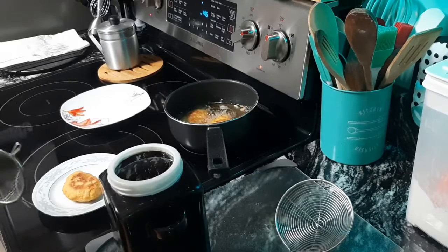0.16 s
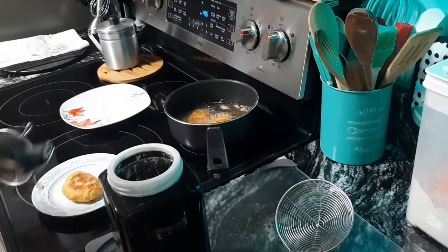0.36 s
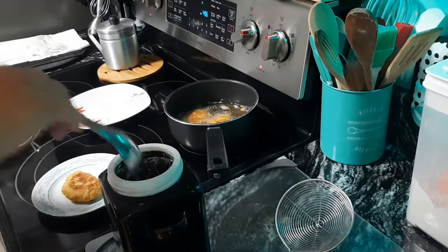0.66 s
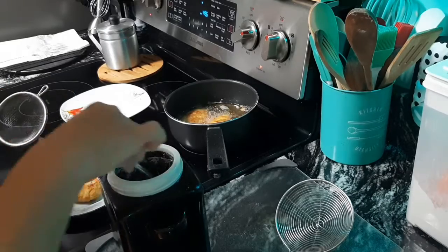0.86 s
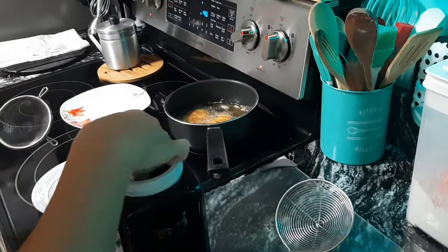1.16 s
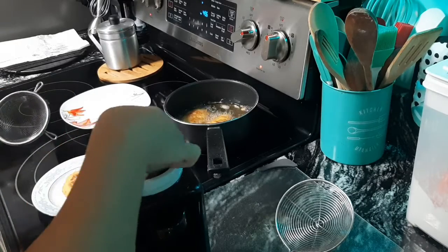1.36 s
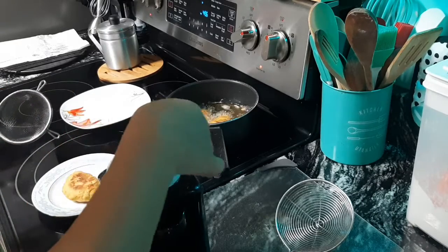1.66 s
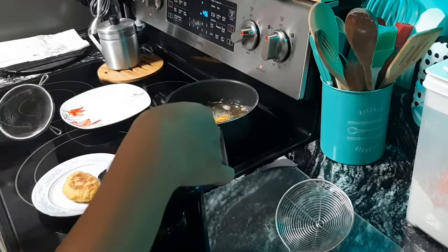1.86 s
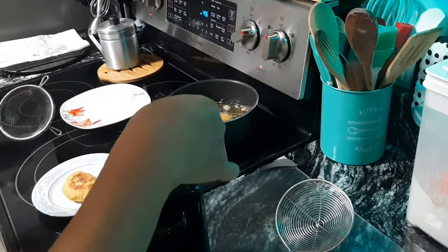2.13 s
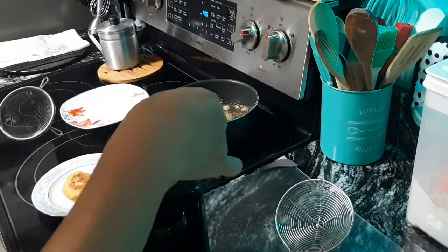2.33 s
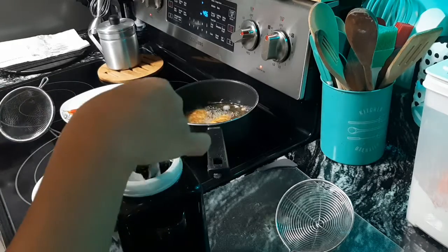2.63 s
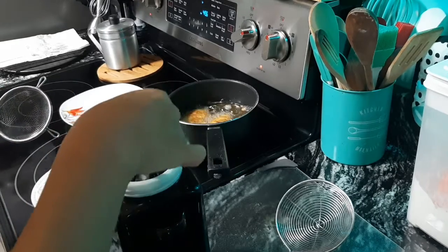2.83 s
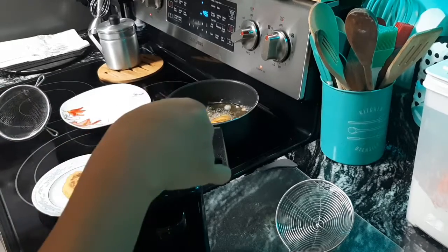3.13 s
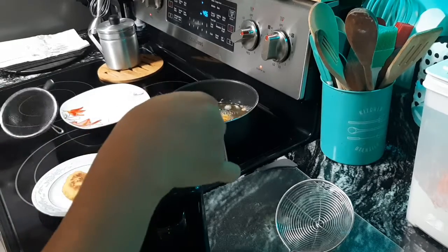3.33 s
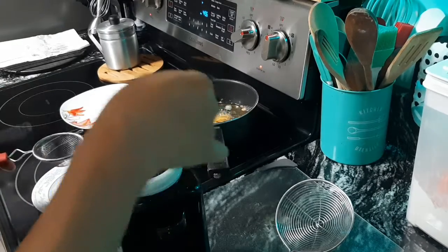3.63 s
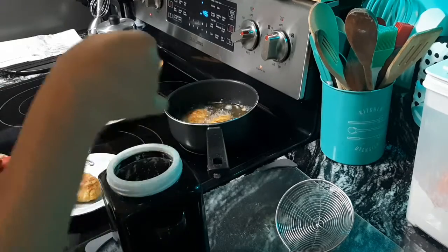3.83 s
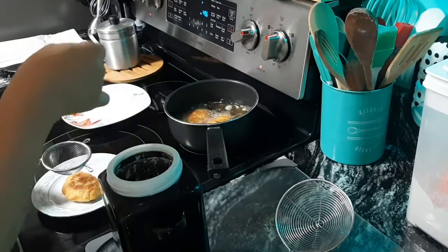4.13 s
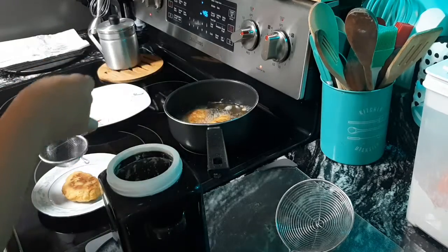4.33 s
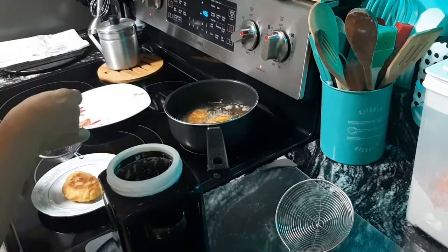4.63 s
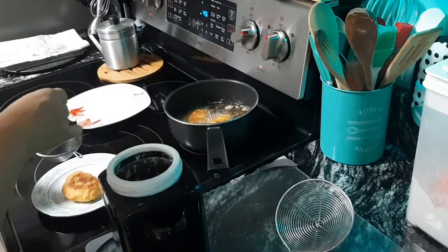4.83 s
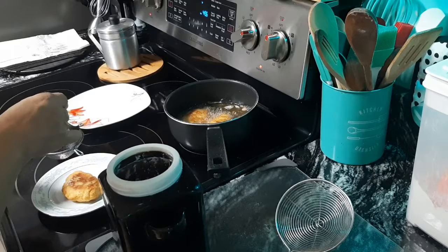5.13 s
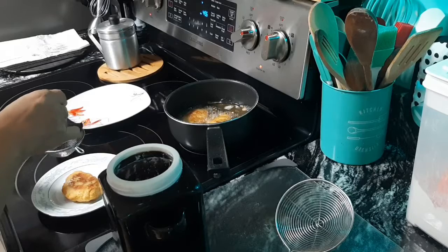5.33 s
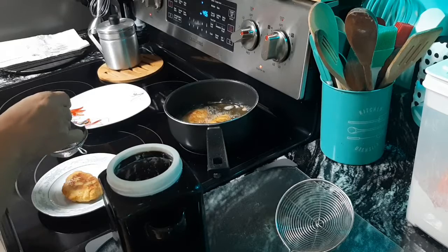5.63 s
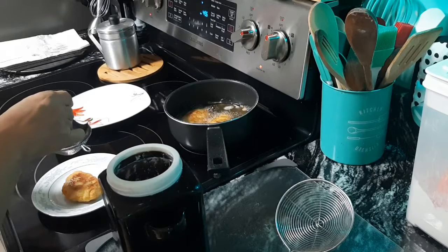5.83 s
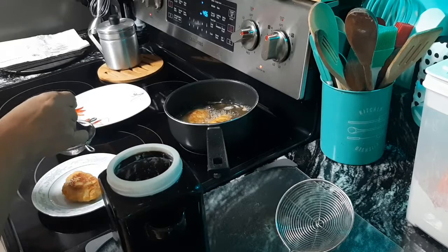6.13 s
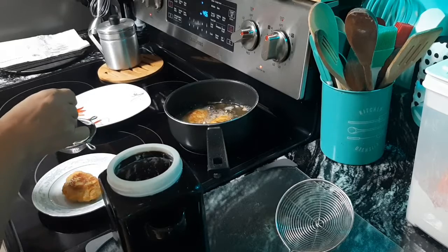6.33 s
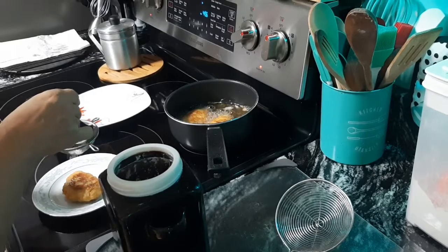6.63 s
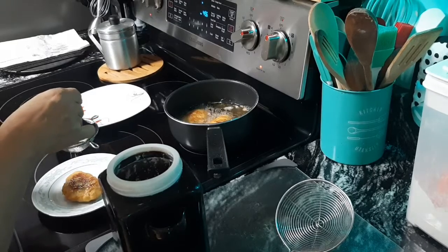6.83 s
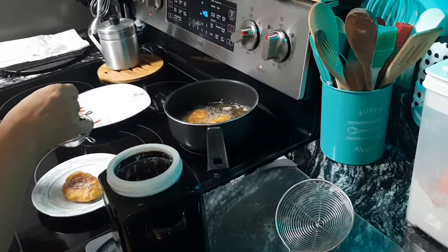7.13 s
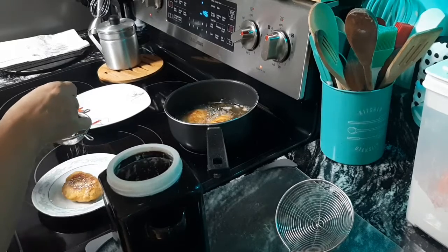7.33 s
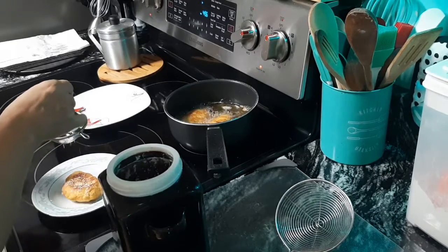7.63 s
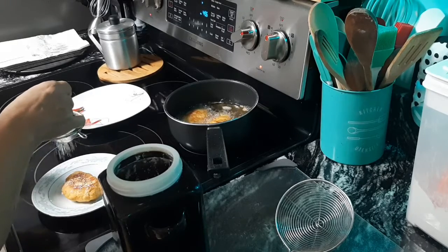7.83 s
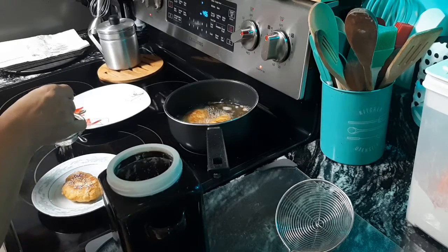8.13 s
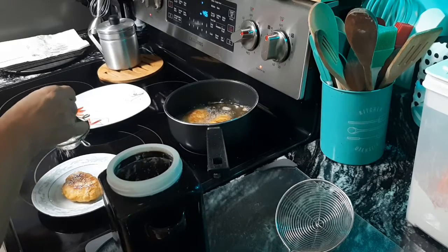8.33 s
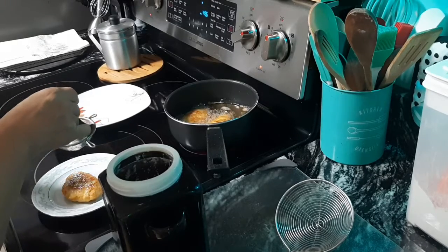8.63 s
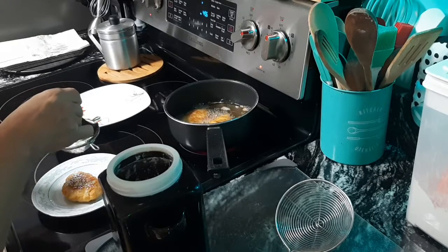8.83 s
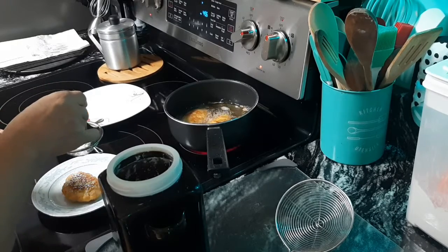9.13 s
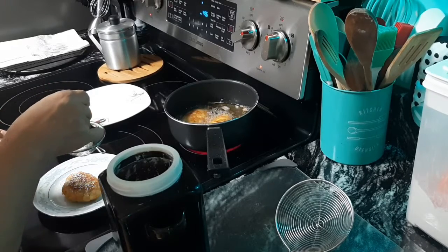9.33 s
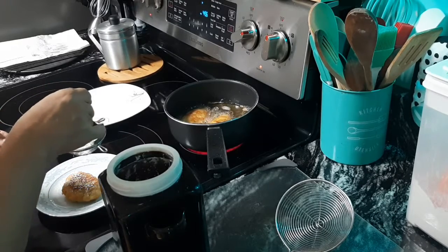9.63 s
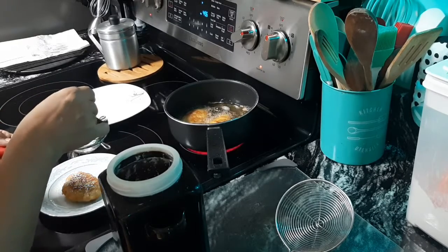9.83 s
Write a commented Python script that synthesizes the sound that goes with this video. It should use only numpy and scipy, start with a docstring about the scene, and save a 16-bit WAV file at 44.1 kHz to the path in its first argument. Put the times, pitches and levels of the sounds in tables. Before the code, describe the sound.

Close stereo pickup of a stovetop: steady, quiet fizzing oil with occasional pops, over two low machine hums that beat together. First a spoon strikes and digs in a jar, with a duller rocking knock and a sharp final clack. Powdered sugar slides softly into a sieve, which is then tapped in crisp, rattly strokes of varying strength. A faint heating hum joins late, and a little more sugar hisses at the close.

```python
"""Two kitchen motors hum and beat while dough fries gently in a small pan of oil: sines, damped-sine bubbles.
A steel spoon clinks into a jar, digs out powdered sugar (modes and coloured force, gritty strokes)
and tips it into a little sieve (hissing noise), which is tapped again and again over a plate
(resonant noise bursts). A heating ring hums late on. A small, hard kitchen adds decaying-noise tails."""
import sys
import numpy as np
from scipy import signal
from scipy.fft import rfft, irfft, next_fast_len
from scipy.io import wavfile
from scipy.ndimage import uniform_filter1d, map_coordinates

SR = 44100
rng = np.random.default_rng(int(sys.argv[2]) if len(sys.argv) > 2 else 0)


def master(y):
    """Save y as 16-bit WAV."""
    cut = np.clip(np.atleast_2d(y).T, -1, 1)
    pcm = np.round(cut * 32767)  # scale
    wavfile.write(sys.argv[1], SR, pcm.astype(np.int16))


N = 440559
T = np.arange(SR // 2) / SR  # time axis of one event, s
TOP_HZ = 15700


def amp(db):
    """Decibels to gain."""
    return 10 ** (np.asarray(db) / 20)


def unit(x):
    """Scale to rms 1."""
    return x / np.sqrt(np.mean(x ** 2) + 1e-20)


def along(points, hz):
    """Interpolate (f/Hz, value) points on a log frequency axis."""
    f, v = np.transpose(points)
    return np.interp(np.log(hz + 1), np.log(f + 1), v)


def colour(points):
    """Zero-phase response of a (f/Hz, level/dB) spectrum."""
    return lambda hz: amp(along(points, hz))


def body(peaks):
    """Causal response of (f/Hz, width/Hz, level/dB) resonances, alternating in sign."""
    def response(f):
        total = 0
        for k, (centre_hz, width_hz, db) in enumerate(peaks):
            damping = 1j * f * width_hz
            total = total + (-1) ** k * amp(db) * damping / (centre_hz ** 2 - f * f + damping)
        return total
    return response


def causal(spectrum):
    """Minimum-phase response of a (f/Hz, level/dB) spectrum, by folding its cepstrum."""
    cepstrum = irfft(np.log(colour(spectrum)(np.fft.rfftfreq(len(T), 1 / SR))))
    return np.exp(rfft(cepstrum * 2 * (T < T[-1] / 2)) - cepstrum[0])


def filtered(x, response):
    """Apply a frequency response to x."""
    n = x.shape[-1]
    m = next_fast_len(n + SR // 8)
    return irfft(rfft(x, m) * response(np.fft.rfftfreq(m, 1 / SR)), m)[..., :n]


def wobble(knots_per_s):
    """Smooth random curve through normal knots."""
    knots = rng.standard_normal(int(N * knots_per_s / SR) + 4)
    return map_coordinates(knots, [np.arange(N) * knots_per_s / SR])


def fade(t60_s):
    """Exponential decay over one event."""
    return np.exp(-np.log(1000) * T / max(t60_s, 1e-4))


def add(track, start_s, sound):
    """Mix a sound into a track."""
    part = track[:, max(round(start_s * SR), 0):][:, :sound.shape[-1]]
    part += sound[..., :part.shape[1]]


# Left-right correlation: f/Hz, correlation
STEREO_LIKENESS = [(60, 1), (130, 0.62), (300, 0.51), (650, 0.35), (1400, 0), (15000, 0.036)]


def noise(response, size):
    """Coloured stereo noise of rms 1: mid and side weights set the channel correlation."""
    def mid_side(hz):
        angle = np.arccos(np.clip(along(STEREO_LIKENESS, hz), -1, 1)) / 2
        return response(hz) * np.array([np.cos(angle), np.sin(angle)])
    mid, side = filtered(rng.standard_normal((2, size)), mid_side)
    return unit(np.array([mid + side, mid - side]))


def stroke(response, length_s, grit_db=0.5):
    """One gritty rub that swells to its peak at length_s / 3, then fades."""
    u = T / (length_s / 3)
    roughness = unit(uniform_filter1d(rng.standard_normal(len(T)), size=90))
    grit = unit(amp(grit_db * roughness))
    return u * np.exp(1 - u) * grit * noise(response, len(T))


def rub(hz, length_s):
    """Dull stroke around one broad pitch."""
    return stroke(lambda f: body([(hz, hz * 1.6, 0)])(f) ** 2, length_s)


# Kitchen decay: f/Hz, t60/s
KITCHEN_T60 = [(150, 0.92), (1500, 0.55), (3000, 0.403), (7000, 0.3), (14000, 0.259)]


def in_room(x, wet_db):
    """Add a fresh diffuse tail of decaying noise whose treble dies first."""
    hz, t, z = signal.stft(rng.standard_normal((2, len(T))), SR, nperseg=256)
    decay = np.exp(-np.log(1000) * t / along(KITCHEN_T60, hz)[:, None])
    tail = signal.istft(z * decay, SR, nperseg=256)[1]
    tail = tail / np.linalg.norm(tail[0])
    return x + amp(wet_db) * signal.fftconvolve(x, tail, axes=1)[:, :x.shape[1]]


# Sieve taps: t/s, level/dB
SIEVE_TAPS = [(5.6275, -34.5), (5.798, -32), (6.3005, -30.5), (6.4594, -28.5), (6.6167, -40.5),
              (6.792, -26.5), (7.154, -35.5), (7.3374, -38.5), (7.527, -32), (7.7238, -25), (7.9022, -31),
              (8.055, -27.5), (8.2299, -38.5), (8.4235, -34), (8.5937, -36.5), (8.774, -39),
              (8.9453, -30.5), (9.1068, -34.5), (9.3026, -31.5), (9.5198, -30.5), (9.7291, -26.5)]
# Wire-frame resonances: f/Hz, width/Hz, level/dB
SIEVE_FRAME = [(2316, 386, -10.5), (4280, 700, 0), (5125, 393, 0.5), (6000, 460, 2), (6390, 434, 0),
               (7955, 200, 2.5), (9040, 400, -11), (10402, 212, -2), (12086, 460, -1), (12607, 320, 0.5),
               (14400, 270, -9.5)]
# Sugar and mesh hiss, also used by sugar(): f/Hz, level/dB
SUGAR_HISS = [(400, -25), (650, -3), (900, -6), (1260, -8.5), (1520, -5.5), (1800, -4.5), (2660, -2.5),
              (7320, 1), (8860, -5.5), (12100, -5.5), (15500, -8)]
ORDINARY_TAP_DB, CHATTER_S = -31, 0.014
BRIGHTEN_DB_PER_OCT_PER_DB, MAX_BRIGHTEN_DB_PER_OCT = 0.67, 1.92  # harder taps are brighter
THUD_GROWTH_DB_PER_DB = 0.4  # thud grows less than chatter


def sieve(snap_db=-5, thud_db=-14, mesh_db=-9):
    """Each tap: a sharp snap, then brief chatter of the mesh in its resonant wire frame."""
    out = np.zeros((2, N))
    for s, db in SIEVE_TAPS:
        harder_db = db - ORDINARY_TAP_DB
        tilt_db = min(BRIGHTEN_DB_PER_OCT_PER_DB * harder_db, MAX_BRIGHTEN_DB_PER_OCT)
        # each tap shifts the modes slightly
        frame = body([(hz * (1 + 0.022 * rng.normal()), width_hz, level_db + 2 * rng.normal())
                      for hz, width_hz, level_db in SIEVE_FRAME])
        metal = noise(lambda hz: frame(hz) * amp(tilt_db * np.log2(hz + 1000)), len(T))
        mesh = amp(mesh_db) * noise(colour(SUGAR_HISS), len(T))
        thud_body = body([(507, 200, -1.0), (1615, 54, -0.96)])
        thud = amp(thud_db - (1 - THUD_GROWTH_DB_PER_DB) * harder_db) * noise(thud_body, len(T))
        chatter = np.exp(-(T / CHATTER_S) ** 1.53)
        snap = amp(snap_db) * fade(0.0011)
        tap = (metal + mesh + thud) * (chatter + snap)
        add(out, s, amp(db - 5.5) * in_room(tap, wet_db=-11))
    return out


def clink(hz=1900, ring_db=-39, tick_hz=12500, tick_db=-38):
    """Between two taps the sieve's rim touches something hard: thin tick and short ring."""
    out = np.zeros((2, N))
    tick = noise(lambda f: body([(tick_hz, 5000, 0)])(f) ** 2, len(T)) * fade(0.074)
    rim = noise(lambda f: body([(hz, 600, 0)])(f) ** 2, len(T)) * fade(0.054)
    add(out, 7.8345, amp(tick_db) * tick + amp(ring_db) * rim)
    return in_room(out, wet_db=-8)


def ring(modes):
    """Decaying modes, each with its own phase per channel and a random level offset."""
    out = 0
    for hz, db, t60_s in modes:
        phase_turns = rng.random((2, 1))
        tone = np.sin(2 * np.pi * (hz * T + phase_turns))
        out = out + amp(db + rng.normal()) * fade(t60_s) * tone
    return out


def blow(spectrum, modes, hold_s, t60_s, ring_db):
    """Contact chatters with an even, white force; the object colours it and rings on."""
    shape = np.minimum(fade(t60_s) * np.exp(np.log(1000) * hold_s / t60_s), 1)
    force = rfft(rng.standard_normal((2, len(T))) * shape)
    force /= np.sqrt(uniform_filter1d(np.abs(force) ** 2, size=50) + 1e-12)  # whiten
    clack = unit(irfft(force * causal(spectrum))) * np.sqrt(np.mean(shape ** 2))
    clack = clack * (T < T[-1] / 2)
    onset = 1 - np.exp(-T / 0.00037)
    return (clack + amp(ring_db) * ring(modes)) * onset


# Contact spectra of spoon on rim, jar rocking on hob, spoon on wall: f/Hz, level/dB
RIM_CONTACT = [(150, -25), (500, -12.5), (750, -7.5), (1150, -18), (1520, -3.5), (1950, -16), (2480, 2.5),
               (2820, -13.5), (3240, 1.5), (3700, -11), (4200, -7), (5700, -18.5), (6450, -8),
               (7500, -15.5), (9300, -26), (11900, -18), (13300, -24), (14500, -23.5), (15500, -30.5)]
ROCK_CONTACT = [(59, -38.5), (100, -10), (595, -17), (772, 3), (906, -6), (1300, -8.5), (1490, 6),
                (1620, -9.5), (2890, -11.5), (3140, -28), (4150, -15.5), (7720, -39.5), (8540, -54.5),
                (12000, -38), (15600, -70), (22000, -120)]
WALL_CONTACT = [(150, -34), (430, -16.5), (700, -17.5), (1000, -20.5), (1300, -17), (1530, 3.5),
                (1760, -20), (2480, -3), (2780, -11), (3280, -3.5), (3750, -16.5), (4300, -24),
                (4820, -15.5), (6000, -30), (7200, -23), (9600, -44.5), (14000, -41.5)]
# Ringing modes of spoon and jar: f/Hz, level/dB, t60/s
SPOON_MODES = [(2344, -7, 0.1), (2520, -13, .14), (3348, -16, .2), (5588, -10, 0.15), (8510, -12, 0.214),
               (11900, 4, 0.079), (14300, -15.5, 0.104)]
JAR_MODES = [(760, -22, 0.15), (1473.5, 1, .1), (1545, -9, 0.32), (2040, -8.5, 0.17), (2493, 10, .066),
             (2567, -22, .3), (2720, -16, 0.3), (3250, -19, 0.174)]


def jar():
    """Spoon clinks on the rim, jar rocks on the hob, spoon cracks on the wall: coloured force plus modes."""
    out = np.zeros((2, N))
    rim = blow(RIM_CONTACT, SPOON_MODES, hold_s=0.0048, t60_s=0.0424, ring_db=-10.5)
    add(out, .8702, amp(-20.5) * in_room(rim, wet_db=-12.5))
    rock = blow(ROCK_CONTACT, JAR_MODES, hold_s=0.006, t60_s=0.096, ring_db=-17)
    add(out, 1.597, amp(-27.5) * in_room(rock, wet_db=-17.5))
    wall = blow(WALL_CONTACT, JAR_MODES, hold_s=0.00455, t60_s=0.033, ring_db=-9.5)
    add(out, 2.9592, amp(-18.0) * in_room(wall, wet_db=-9.5))
    return out


# Spoon digging in the jar: t/s, level/dB, length/s
SPOON_DIGS = [(1.171, -50, 0.052), (1.276, -51, .035), (1.312, -43, 0.017), (1.361, -51.5, 0.065),
              (1.626, -42.5, .037), (1.976, -47, 0.0254), (3.163, -47, 0.015)]
# Air resonances of the jar: f/Hz, width/Hz, level/dB
JAR_HOLLOW = [(357, 74, 6), (736, 115, 2), (1049, 62, 2), (1555, 158, 0.5), (2320, 400, -8.5),
              (3120, 700, -10.5)]
# Spoon rubbing on jar or sieve: t/s, level/dB, f/Hz, length/s
SPOON_RUBS = [(1.576, -50.5, 3840, 0.0123), (1.761, -52, 2070, 0.051), (1.801, -45, 1724, 0.043),
              (3.153, -49.5, 5860, .0105), (7.679, -53, 900, 0.183)]
# Dull bumps on the hob: t/s, level/dB
HOB_BUMPS = [(1.642, -51), (3.15, -53), (8.11, -53)]
BUMP_HZ, BUMP_S = 88, 0.054
SLIPS_PER_S, SLIP_DB = 120, 2  # spoon sticks and slips in the sugar


def scrapes():
    """Digs excite the jar's hollow, the rim sings, rubs and bumps stay dull: all filtered-noise strokes."""
    out = np.zeros((2, N))
    for s, db, length_s in SPOON_DIGS:
        add(out, s, amp(db) * stroke(body(JAR_HOLLOW), length_s))
    out = out * unit(amp(SLIP_DB * wobble(SLIPS_PER_S)))
    for s, db, hz, length_s in SPOON_RUBS:
        add(out, s, amp(db) * rub(hz, length_s))
    for s, db in HOB_BUMPS:
        add(out, s, amp(db) * rub(BUMP_HZ, BUMP_S))
    add(out, 1.591, amp(-39) * rub(hz=1800, length_s=0.0096))  # jar skids just before it rocks
    hollow_bump = stroke(lambda f: body([(520, 330, 0)])(f) ** 2, 0.044)
    add(out, 8.095, amp(-48.5) * hollow_bump)
    rim_song = stroke(body([(3220, 57, 0)]), 0.044)
    add(out, 1.775, amp(-53) * rim_song)
    return in_room(out, wet_db=-8.5)


# Sugar sliding off the spoon and through the mesh: t/s, level/dB, t60/s
SUGAR_SLIDES = [(3.633, -39.5, 0.26), (3.795, -49.5, 0.252), (4.053, -48.5, 0.34), (4.282, -50.5, 0.35),
                (9.755, -51.5, 0.59), (9.826, -40, 0.37), (9.924, -37.5, 0.06)]
SLIDE_RISE_S = .004


def sugar(wire_hz=12350, wire_db=-45):
    """Sliding sugar and the spoon on the mesh hiss as coloured noise; one narrow band is a singing wire."""
    out = np.zeros((2, N))
    rise = 1 - np.exp(-T / SLIDE_RISE_S)
    for s, db, t60_s in SUGAR_SLIDES:
        add(out, s, amp(db) * noise(colour(SUGAR_HISS), len(T)) * rise * fade(t60_s))
    wire = noise(body([(wire_hz, 70, 0)]), len(T)) * rise * fade(0.2)
    add(out, 3.795, amp(wire_db) * wire)
    return in_room(out, wet_db=-1.5)


def bubbles(pitch_hz, spread, cycles, scatter_db, count):
    """Bubbles burst at random: damped sines, mostly tiny, decaying by 1/e in `cycles` periods."""
    t = T[:SR // 100]
    when, pitch, size, left, right = rng.random((count, 5)).T[:, :, None]
    hz = np.minimum(pitch_hz * np.exp(spread * (2 * pitch - 1)), TOP_HZ)
    level = amp(-scatter_db * np.log(size * .99 + .01))
    life = level * np.exp(-t * hz / cycles)
    at = ((when * N).astype(int) + np.arange(len(t))).ravel()
    channels = []
    for lag in (left, right):
        bursts = life * np.sin(2 * np.pi * (hz * t + lag))
        channels.append(np.bincount(at, bursts.ravel(), N)[:N])
    return unit(np.array(channels))


def pop(db, hz):
    """One larger bubble bursts: resonant noise with a short decay."""
    return amp(db) * noise(lambda f: body([(hz, hz / 2.5, 0)])(f) ** 2, len(T)) * fade(0.033)


# Big bubbles that stand out: t/s, level/dB, f/Hz
BIG_POPS = [(.666, -47, 11500), (3.312, -46, 1550), (3.6, -42, 2730), (4.818, -46.5, 2900),
            (5.151, -49, 2130), (9.241, -45, 2800)]
POP_DB, POP_SCATTER_DB, POP_HZ, POP_SPREAD_OCT = -53, 3, 2200, 0.24  # lesser pops


def popping(count):
    """Big pops, plus lesser ones at a random moment in each of `count` equal slots."""
    out = np.zeros((2, N))
    for s, db, hz in BIG_POPS:
        add(out, s, pop(db, hz))
    for k, (when, size, pitch) in enumerate(rng.random((count, 3))):
        db = POP_DB + POP_SCATTER_DB * (2 * size - 1)
        hz = POP_HZ * 2 ** (POP_SPREAD_OCT * (2 * pitch - 1))
        add(out, (k + when) / count * N / SR, pop(db, hz))
    return out


# Finest bubbles: f/Hz, level/dB
FIZZ_SPECTRUM = [(410, -17), (700, -18.5), (884, -18), (968, -6.5), (1220, -19.5), (1520, -1), (1850, -18),
                 (2840, -11), (3360, -17), (3630, -13.5), (4130, -13), (7600, -15.5), (8760, -24.5),
                 (11800, -15.5), (15500, -20)]
# Pan resonances: f/Hz, width/Hz, level/dB
PAN_MODES = [(432, 78, -4), (993, 150, -9), (1490, 55, 0), (2950, 500, -40)]
SIMMER_DB, SIMMER_DRIFT_DB = -62.5, .4


def frying():
    """Fizz noise, crackle and plop bubbles in the oil; bubbling keeps the pan ringing faintly."""
    simmer = amp(SIMMER_DB + SIMMER_DRIFT_DB * wobble(2.12))
    fizz = amp(3.5 + 1.1 * wobble(12)) * noise(colour(FIZZ_SPECTRUM), N)
    crackle = amp(-8.5) * bubbles(pitch_hz=7185, spread=0.786, cycles=6.5, scatter_db=2.0, count=3000)
    plops = amp(-6) * bubbles(pitch_hz=2603, spread=0.706, cycles=11.0, scatter_db=3.5, count=700)
    drive = bubbles(pitch_hz=1340, spread=0.82, cycles=1.18, scatter_db=2.5, count=2500)
    pan = amp(-2.5) * unit(filtered(drive, body(PAN_MODES)))
    bursts = simmer * (crackle + plops + pan) + popping(count=14)
    return simmer * fizz + in_room(bursts, wet_db=-4)


# Motor hums: f/Hz, level/dB rms
MOTOR_HUMS = [(48.676, -51.2), (56.667, -51.7)]
# First motor's casing buzz: shaft order, level/dB rms
SHAFT_ORDERS = [(10, -76.5), (11, -76.5), (12, -73), (14, -77), (16, -78), (17, -77.5), (18, -70),
                (19, -80.5), (21, -78.5), (22, -79), (23, -79.5), (26, -76)]
# Another low, wavering hum tone: f/Hz, level/dB rms
LOW_HUM = [(93.8, -71.5)]
# Fan air: f/Hz, level/dB
FAN_AIR = [(15, -8), (30, -15), (42, 1), (60, 3.5), (80, 0), (100, 1.5), (125, -2), (155, -14),
           (230, -10.5), (400, -11), (560, -10), (750, -22), (1200, -25.5), (2500, -73.5)]


def machines(in_step_s=0.03528):
    """Two motor hums beat, in phase at in_step_s, over wavering low hum, shaft-order buzz and fan air."""
    t = np.arange(N) / SR
    hum = sum(amp(db) * np.cos(2 * np.pi * hz * (t - in_step_s)) for hz, db in MOTOR_HUMS)
    shaft_hz = MOTOR_HUMS[0][0] / 2  # two pushes per turn
    tones = [(round(order) * shaft_hz, db) for order, db in SHAFT_ORDERS] + LOW_HUM
    wavering = np.zeros(N)
    for hz, db in tones:
        level = amp(db + 2.0 * wobble(1.86))
        wavering += level * np.sin(2 * np.pi * (hz * t + rng.random()) + 1.3 * wobble(6))
    air = amp(-59.5) * noise(colour(FAN_AIR), N)
    return np.sqrt(2) * (hum + wavering) + air


def element(on_s=8.1, mains_hz=60):
    """Hob's heating ring switches on and hums as a sine at twice the mains frequency."""
    t = np.arange(N) / SR
    switch = np.clip((t - on_s) * 20, 0, 1)  # 50 ms ramp
    return amp(-64.5) * switch * np.sin(2 * np.pi * 2 * mains_hz * t)


# Stereo balance: f/Hz, left minus right level/dB
STEREO_BALANCE = [(60, -.5), (300, -1.03), (1300, -0.5), (4400, -3), (15000, -3)]


def scene():
    """Sum all sources; the treble is stronger on the right."""
    jar_blows = jar() * amp([[-1], [.7]])  # left, right dB
    handling = sieve() + clink() + jar_blows + scrapes() + sugar()
    stove = handling + frying() + machines() + element()
    return filtered(stove, lambda hz: amp(np.outer([.5, -.5], along(STEREO_BALANCE, hz))))


def record(dry):
    """Steep zero-phase low-pass at TOP_HZ."""
    return filtered(dry, lambda hz: 1 / (1 + (hz / TOP_HZ) ** 160))


dry = scene()
out = record(dry)
master(out)
```